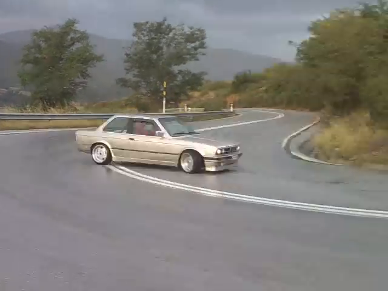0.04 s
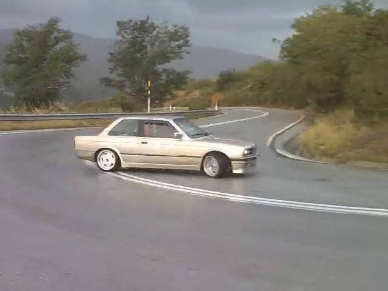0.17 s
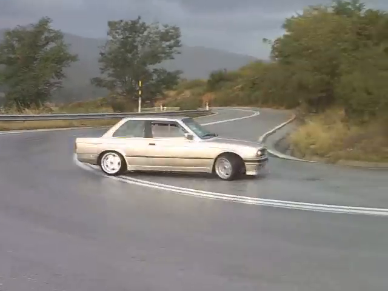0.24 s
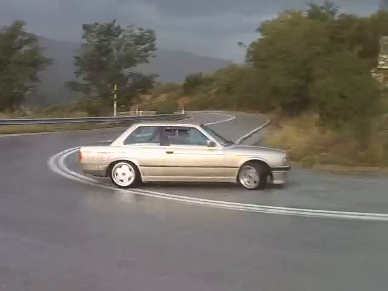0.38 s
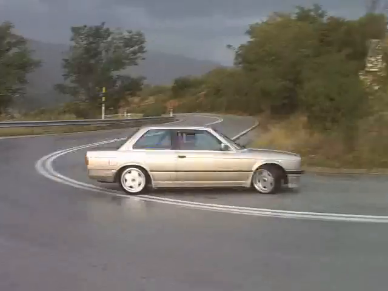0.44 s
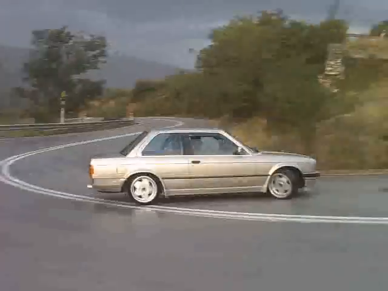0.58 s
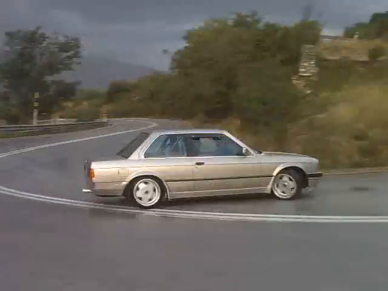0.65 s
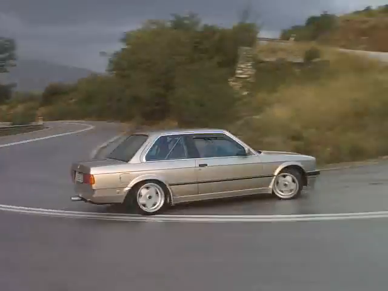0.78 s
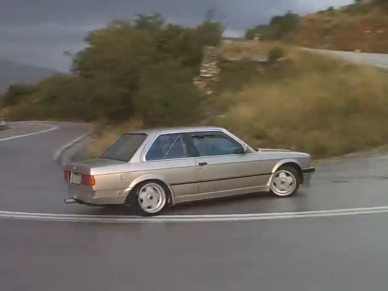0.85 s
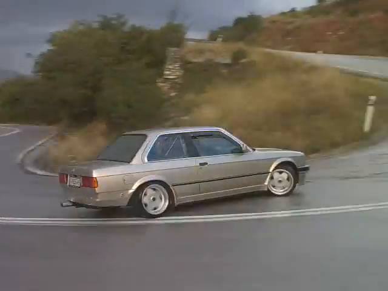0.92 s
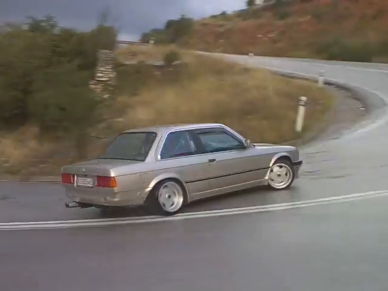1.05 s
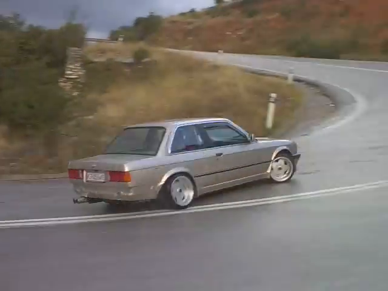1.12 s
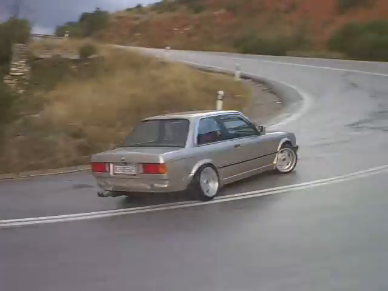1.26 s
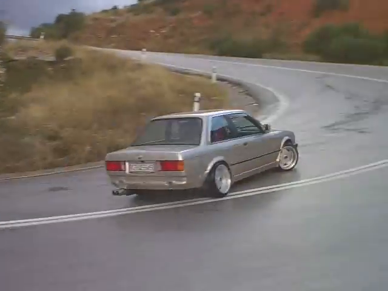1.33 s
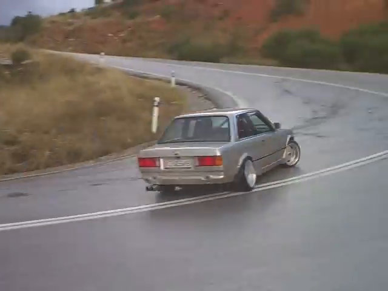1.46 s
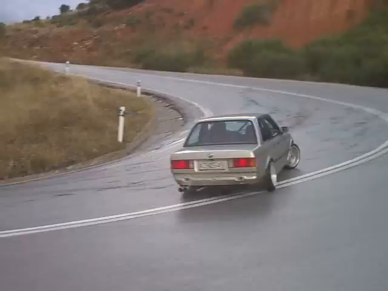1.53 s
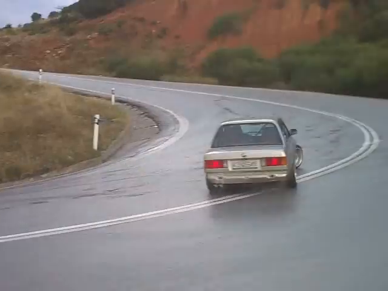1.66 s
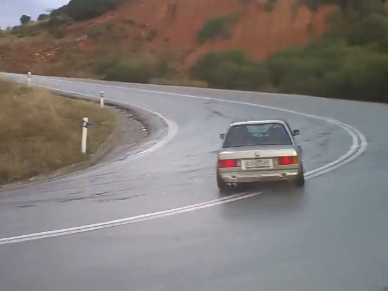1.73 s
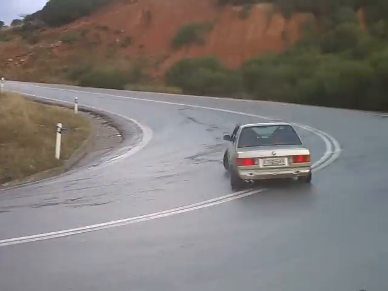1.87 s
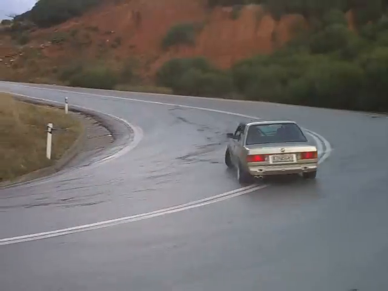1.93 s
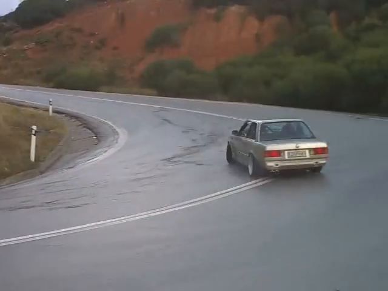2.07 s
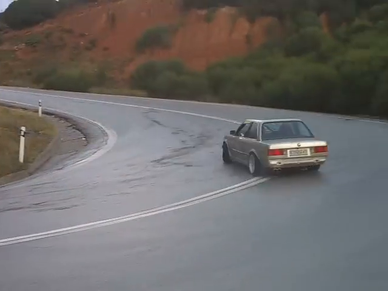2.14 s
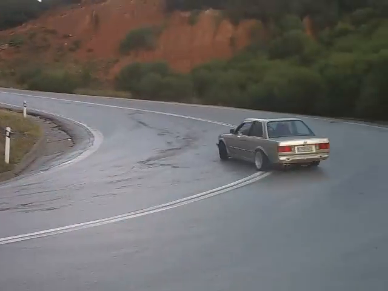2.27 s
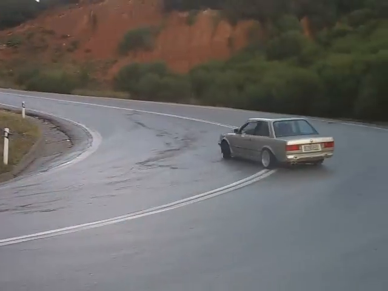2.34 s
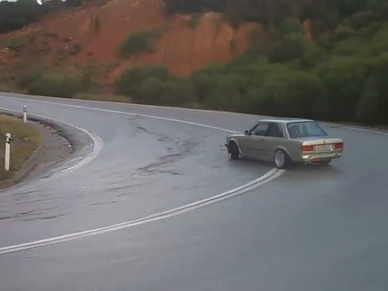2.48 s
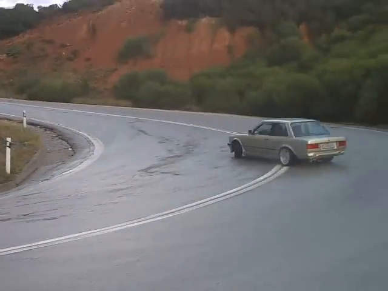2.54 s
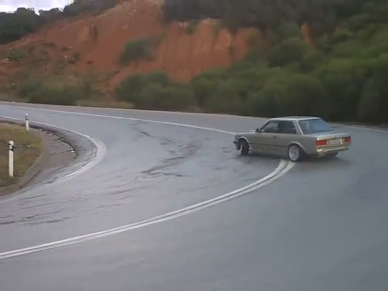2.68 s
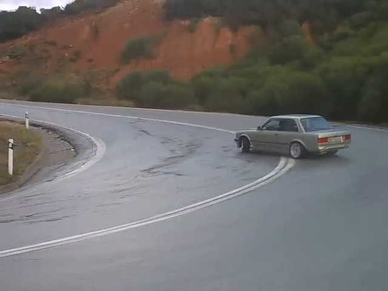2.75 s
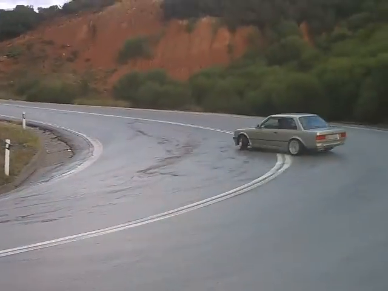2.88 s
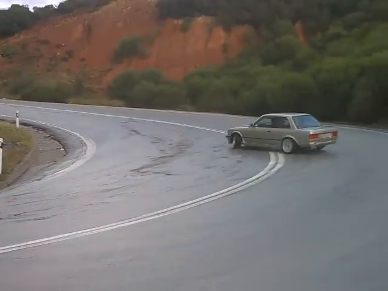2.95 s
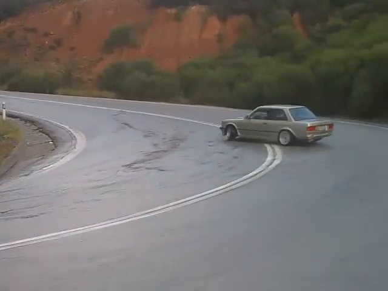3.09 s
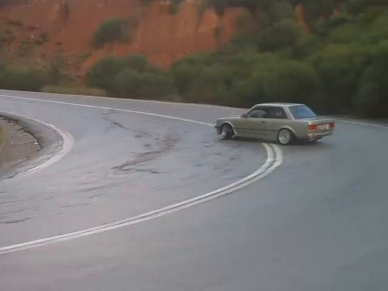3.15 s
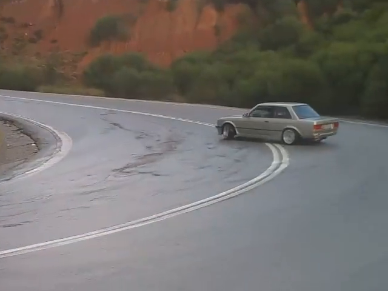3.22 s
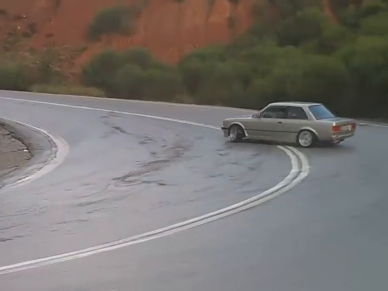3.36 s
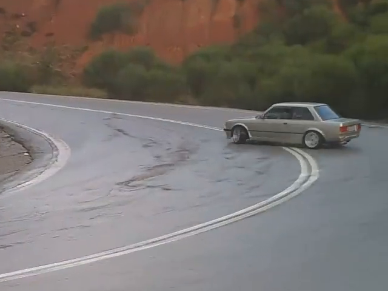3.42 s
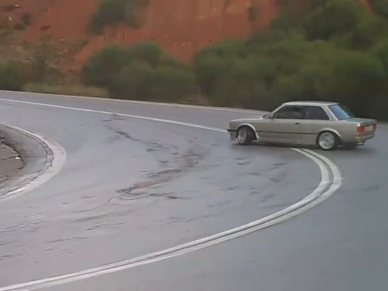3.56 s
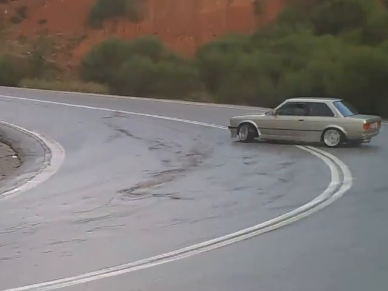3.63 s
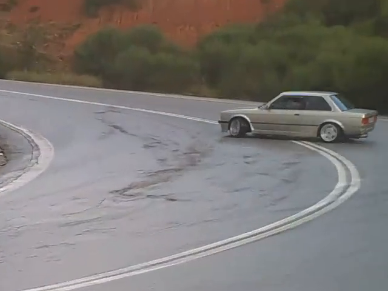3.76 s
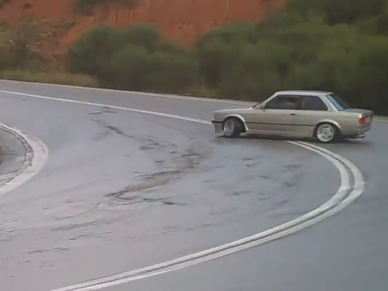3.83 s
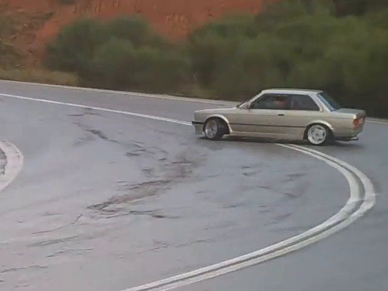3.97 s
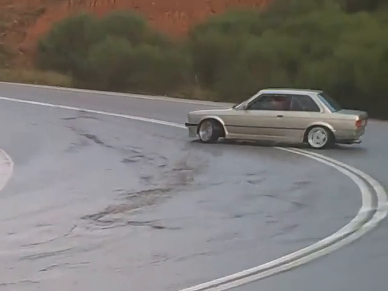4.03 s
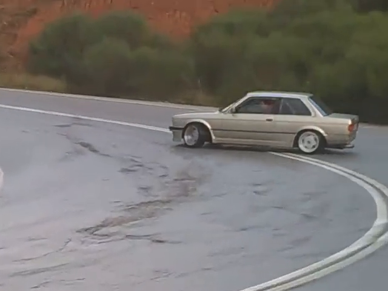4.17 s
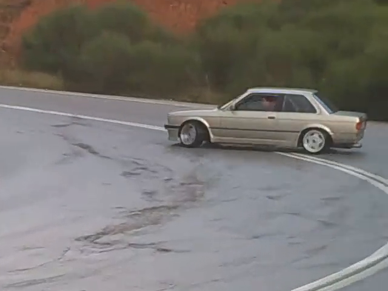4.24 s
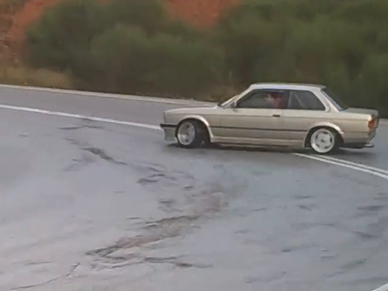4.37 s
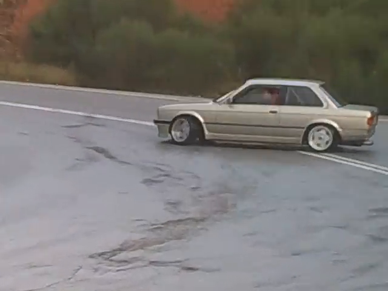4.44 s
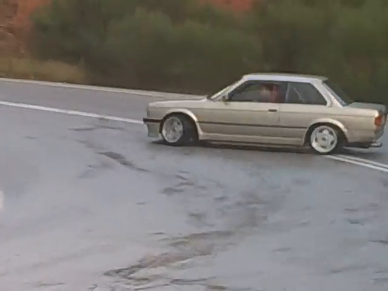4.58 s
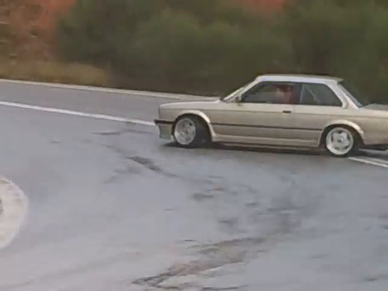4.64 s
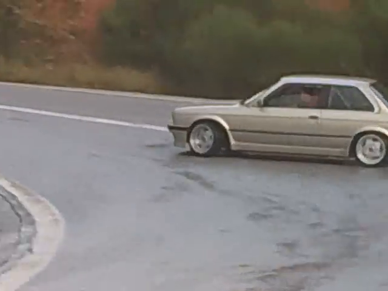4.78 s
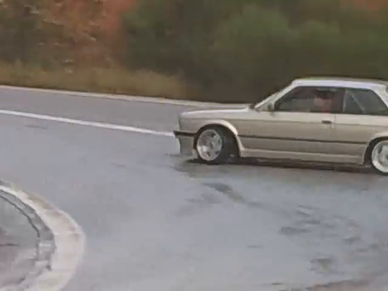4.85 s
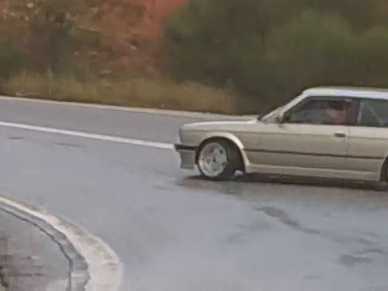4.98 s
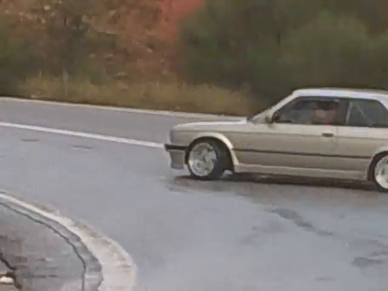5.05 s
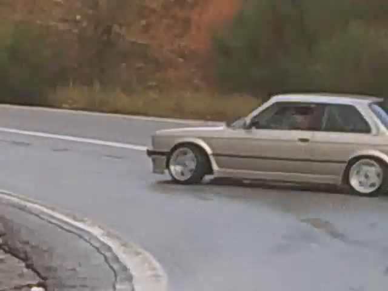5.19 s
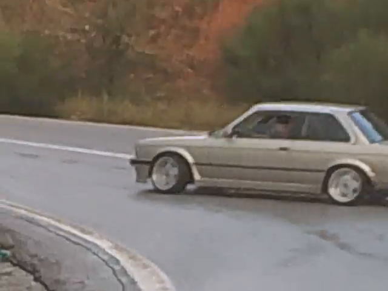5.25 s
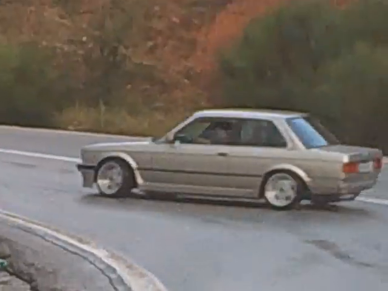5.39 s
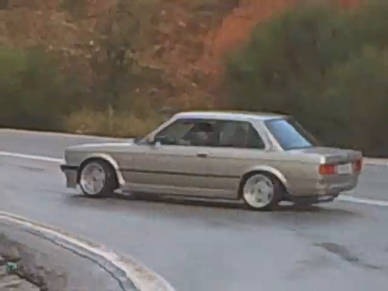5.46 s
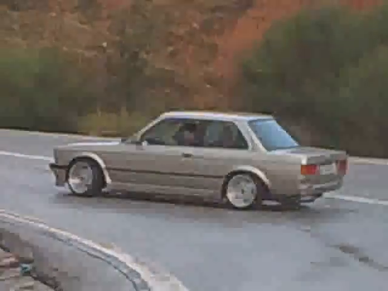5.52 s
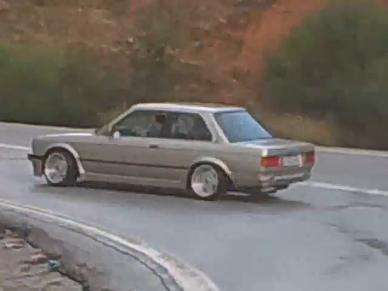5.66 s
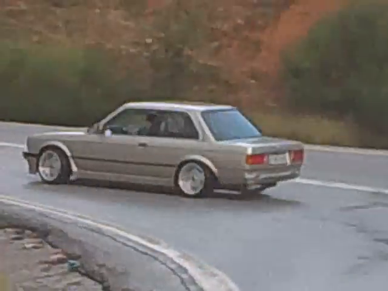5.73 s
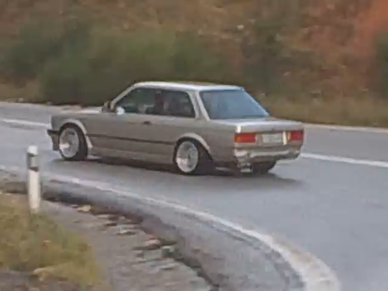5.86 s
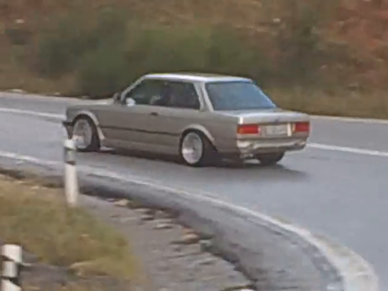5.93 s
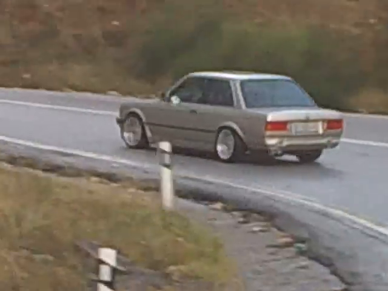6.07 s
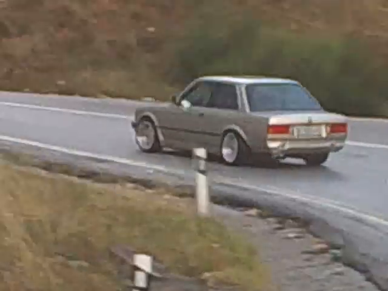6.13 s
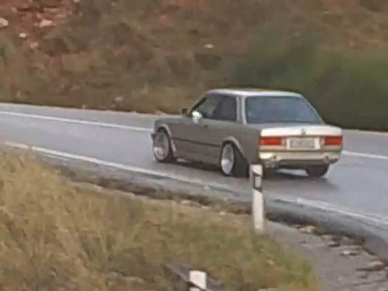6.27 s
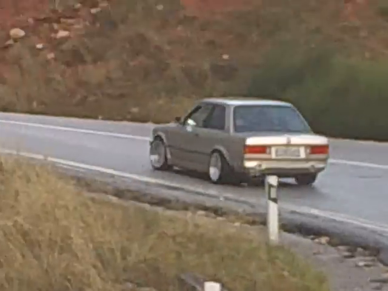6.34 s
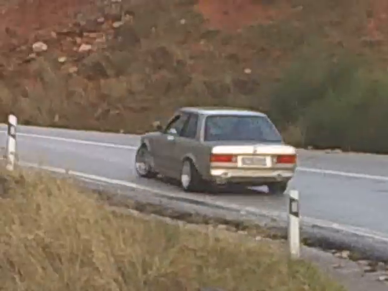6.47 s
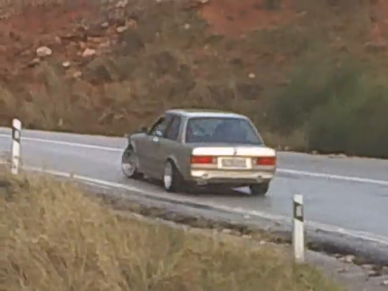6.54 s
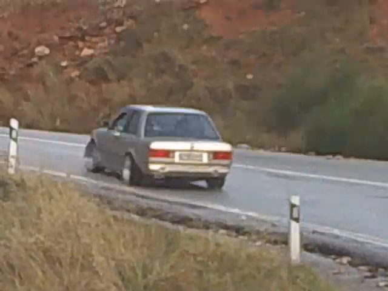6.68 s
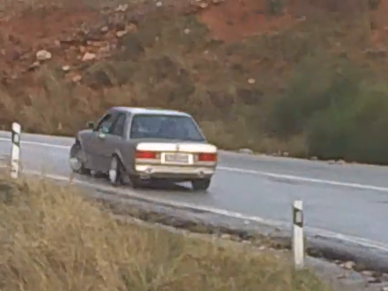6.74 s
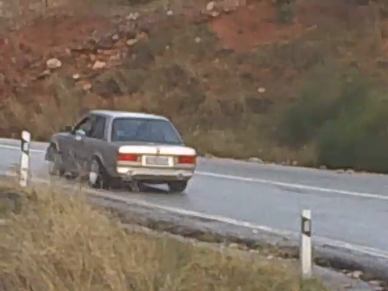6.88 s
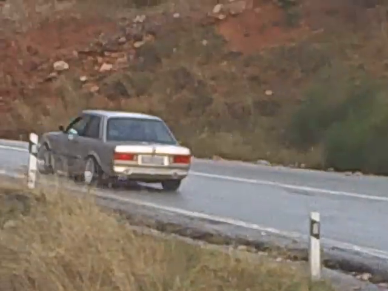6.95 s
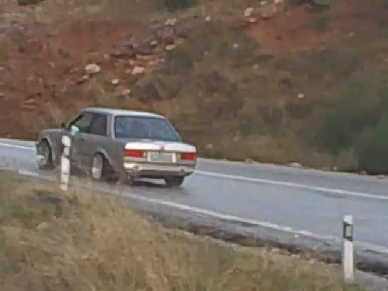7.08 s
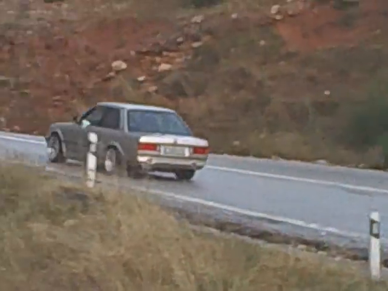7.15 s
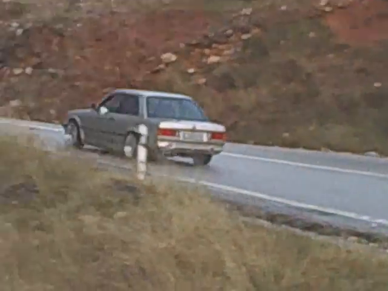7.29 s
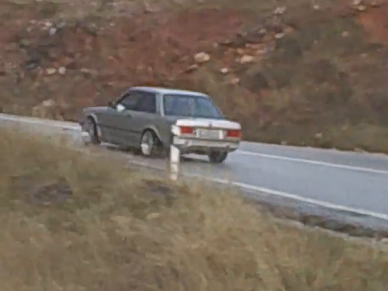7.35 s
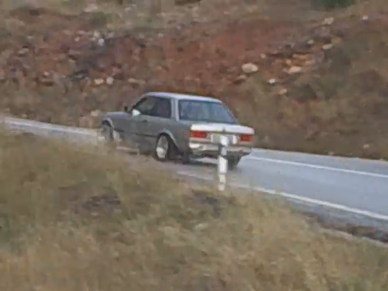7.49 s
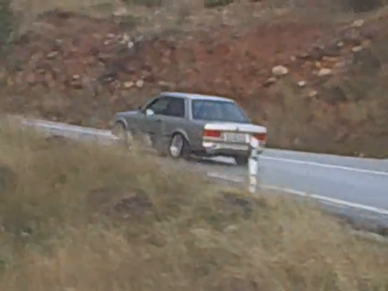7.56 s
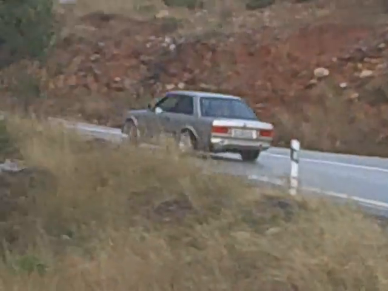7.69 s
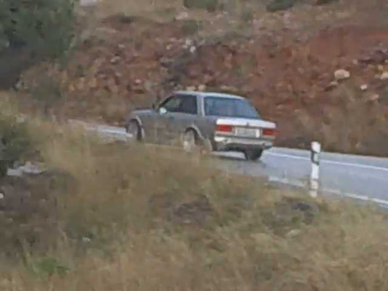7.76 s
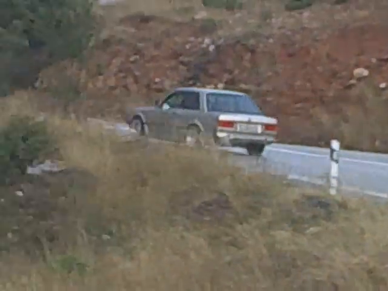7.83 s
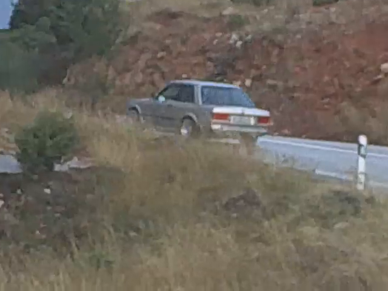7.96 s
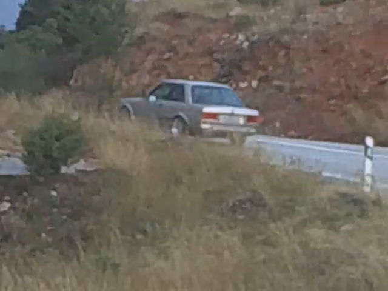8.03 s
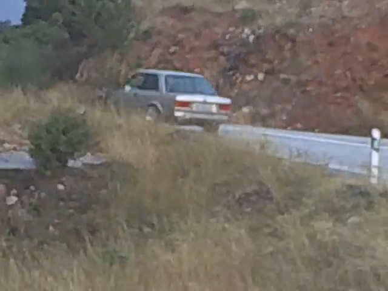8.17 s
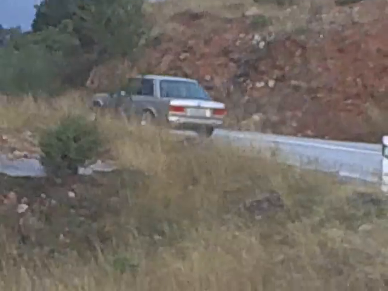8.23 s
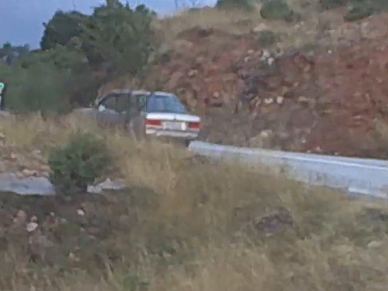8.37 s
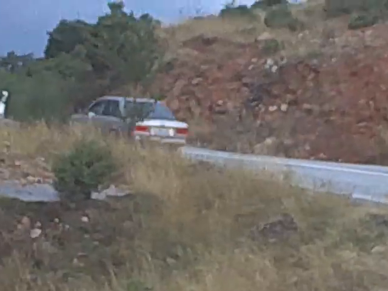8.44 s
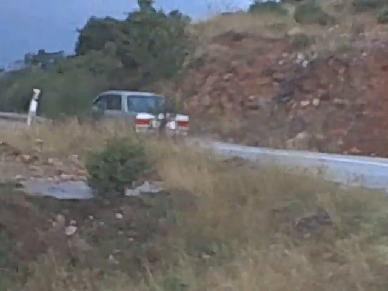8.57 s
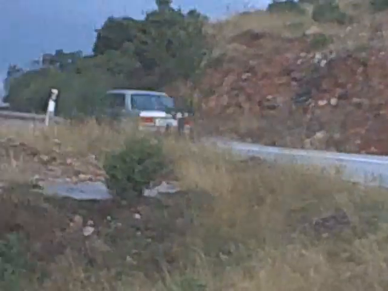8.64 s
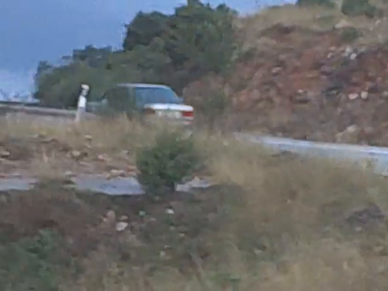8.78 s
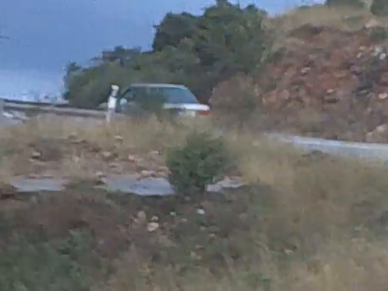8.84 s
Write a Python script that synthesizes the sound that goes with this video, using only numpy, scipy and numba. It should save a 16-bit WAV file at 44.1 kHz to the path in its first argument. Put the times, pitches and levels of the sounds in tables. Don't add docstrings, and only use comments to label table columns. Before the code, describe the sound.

Outdoors on a wet hillside road, heard through a narrow, boxy small microphone that distorts on peaks. From 0 s a car is already sliding: a gritty scrub and splash, another slip at 0.25, then at 0.6-1.2 loud rough tyre noise with quick chirps near 1 kHz while the engine pulls hard, raspy and rising, strongest around 1.1-1.3. More scrubs and a throaty climb follow to 1.8. From 2 to 3.1 it is quieter, with shorter throttle stabs; revs climb to a singing peak near 3.6 with a renewed wet hiss, then sag by 4.3. From 4.3 to 6.5 softer revs rise again, over faint tyre noise. At 6.5-7.2 tyres squeal in stuttering cries, loudest near 6.75 and again about 7.1. The engine falls to a low purr with a faint tinny rattle, fading until 8.9. A short rocky echo blurs everything.

```python
import sys
import numpy as np
from scipy import signal
from scipy.fft import rfft, irfft, next_fast_len
from scipy.io import wavfile
from scipy.ndimage import uniform_filter1d
from numba import njit

SR = 44100
rng = np.random.default_rng(int(sys.argv[2]) if len(sys.argv) > 2 else 0)


def unload_audio(sound):
    columns = np.transpose(np.atleast_2d(sound))
    steps = np.round(np.clip(columns, -1, 1) * 32767)
    wavfile.write(sys.argv[1], SR, steps.astype(np.int16))


def magnitude_from_level(level_db):
    exponent = np.asarray(level_db, float) / 20
    return 10 ** exponent


N = 392931


@njit
def svf(x, hz, width):
    y, band_state, low_state = np.empty(len(x)), 0., 0.
    for i in range(len(x)):
        g, damping = np.tan(np.pi * hz[i] / SR), width[i] / hz[i]
        v = (band_state + g * (x[i] - low_state)) / (1 + g * (g + damping))
        band_state = 2 * v - band_state
        low_state = low_state + 2 * g * v
        y[i] = damping * v
    return y


def band(x, hz, width_hz):
    return svf(x, hz * np.ones(N), width_hz * np.ones(N))


def band_twice(x, hz, width_hz):
    return band(band(x, hz, width_hz), hz, width_hz)


def unit(x):
    return x / np.sqrt(np.mean(x ** 2))


def walk(rate):
    hold = int(SR / rate)
    steps = np.repeat(rng.standard_normal(N // hold + 1), hold)
    return unit(uniform_filter1d(uniform_filter1d(steps, hold), hold)[:N])


def read(table):
    s, *columns = np.transpose(table)
    return [np.interp(np.arange(N) / SR, s, c) for c in columns]


def turns(hz):
    return np.cumsum(hz) / SR


# opens in seconds, shuts in seconds, firing rate from in Hz,
# firing rate to in Hz, exhaust level in dB.
PULLS = [(0.152, .3, 131.2, 148, -35), (.62, 1.1, 121, 170.7, -19.5), (1.099, 1.32, 170.7, 186.7, -11.5),
         (1.318, 1.81, 186.4, 213, -16.5), (2.004, 2.27, 187.9, 200.7, -29),
         (2.261, 2.42, 198.8, 196.3, -28.5), (2.462, 2.618, 177.7, 159.4, -41),
         (2.61, 2.802, 160.5, 169.2, -36), (2.798, 3.13, 168.8, 193.1, -31), (3.132, 3.63, 193.7, 221, -29),
         (3.761, 4.1, 196.9, 159.7, -42), (4.331, 4.75, 121.4, 151.9, -40), (4.753, 5.02, 151, 177.5, -45),
         (5.024, 5.28, 176.3, 193, -29), (5.27, 5.68, 191.9, 195.6, -38.5),
         (5.695, 5.86, 194.5, 186.8, -35), (5.85, 6.152, 186.3, 198.7, -33.5),
         (6.15, 6.541, 198.3, 202.5, -34), (6.781, 7.12, 154.1, 139.3, -43.5),
         (7.138, 7.36, 135.1, 110.8, -39.5), (7.395, 7.9, 110.8, 119.6, -45.5),
         (7.892, 8.76, 119.3, 131.9, -50), (8.779, 8.91, 132, 159.2, -50)]
START_HZ, CEILING_HZ = 119.1, 268.2
LINGER_S = 0.038
PEDAL_S = .06


def throttle():
    t = np.arange(N) / SR
    opens, shuts, from_hz, to_hz, db = np.transpose(PULLS)
    s = np.maximum.accumulate(np.r_[0, np.c_[opens, shuts].ravel()])
    hz = np.r_[START_HZ, np.c_[from_hz, to_hz].ravel()]
    down = sum((t > a - .002) & (t < b + .002) for a, b in zip(opens, shuts)) > 0
    climb = CEILING_HZ - np.exp(np.interp(t, s, np.log(CEILING_HZ - hz)))
    hz = uniform_filter1d(np.where(down, climb, np.interp(t, s, hz)), size=SR // 16)
    keep = np.exp(-1 / (LINGER_S * SR))
    flow = np.maximum(down, signal.lfilter([1 - keep], [1, -keep], 1. * down))
    level_db = np.interp(t, (opens + shuts) / 2, db)
    return hz, level_db, uniform_filter1d(flow, max(int(PEDAL_S * SR), 1))


SLIDE_ATTACK_DB_S, SLIDE_RELEASE_DB_S = 199, 96.5


def slides(table, rest_db):
    t = np.arange(0, N + 64, 64) / SR
    power = magnitude_from_level(2 * np.interp(t, np.arange(N) / SR, rest_db))
    for s, length, db, *_ in table:
        attack_db = SLIDE_ATTACK_DB_S * np.maximum(s - t, 0)
        release_db = SLIDE_RELEASE_DB_S * np.maximum(t - s - length, 0)
        power = power + magnitude_from_level(2 * (db - attack_db - release_db))
    s, length, _, *columns = np.transpose(table)
    return read(np.c_[t, np.sqrt(power)]) + read(np.c_[s + length / 2, np.transpose(columns)])


def spray(hz, width_hz, patchy_db):
    x = band_twice(rng.standard_normal(N), hz, width_hz)
    return unit(x * magnitude_from_level(patchy_db * walk(55) + .4 * walk(6)))


def slip(hz, overtone_db, wobble, flicker_db):
    phase = 2 * np.pi * turns(hz * (1 + wobble * walk(90)))
    overtones = np.sin(2 * phase) + 0.55 * np.sin(3 * phase)
    wave = np.sin(phase) + magnitude_from_level(overtone_db) * overtones
    return unit(magnitude_from_level(flicker_db * walk(60))) * wave * np.sqrt(2)


def scrub(hz, width_hz):
    blocks = sum(slip(hz + width_hz * (side + .12 * walk(9)), -18.5, .035, 4.5) for side in (-.3, 0, .35))
    return 0.59 * unit(blocks) + 0.8 * spray(hz, width_hz, 2.9)


# start in seconds, length in seconds, level in dB, centre in Hz.
SPLASHES = [
    (0, 0.036, -15.5, 1613),
    (.25, 0.045, -22.5, 1880),
    (.82, 0.13, -23.5, 2320),
    (3.36, .12, -30, 2408),
    (6.69, 0.051, -28.5, 1780),
    (6.82, 0.13, -40.5, 2487),
    (7.01, .03, -34, 2480),
]


def splashes():
    gain, hz = slides(SPLASHES, np.full(N, -120))
    return gain * spray(hz, 590, patchy_db=2.5)


# time in seconds, nearness in dB, depth of water as spray in dB.
ROLL = [(0, -25.5, -4), (.6, -27, -1.5), (1.1, -20, 1), (1.4, -29.5, -0.5), (1.8, -28.5, -8.5),
        (2.2, -39.5, 2), (3.15, -44.5, 3), (3.45, -29, -1.5), (3.95, -40, 3), (4.35, -48.5, -1),
        (4.62, -59.5, 5), (5.1, -50, 5), (6.0, -49, 13.5), (6.6, -50, 12.5), (6.9, -36, 7), (7.3, -55, 0.5),
        (7.7, -63.5, 9), (8.91, -67.5, 9.5)]
# start in seconds, length in seconds, scrub level in dB,
# scrub centre in Hz, scatter of the tread blocks in Hz.
SLIDES = [(0, 0.0966, -19, 1130, 500), (.25, .2, -27, 1175, 450), (.58, .2, -13.5, 1170, 400),
          (.92, .26, -16.5, 1300, 410), (1.44, .11, -18, 1060, 420), (1.64, .15, -17, 1130, 420),
          (1.89, .12, -24, 1250, 429.2), (2.1, .2, -30, 1186, 442), (2.45, .2, -38, 1100, 460),
          (2.9, .3, -35.5, 1050, 480), (3.36, .3, -31.5, 1025, 500), (3.72, .2, -35.5, 1015, 520),
          (4.0, .3, -47, 1101, 551), (4.45, .1, -48.5, 978.3, 399.4), (5.0, .2, -59, 961, 498.6),
          (5.8, .45, -40.5, 1310, 600), (6.4, .08, -30, 1270, 550), (6.5, .1, -31, 1093, 299.2),
          (6.62, .04, -23.5, 1040, 252), (6.72, 0.088, -19.5, 961.7, 249.6), (6.86, 0.22, -27, 1050, 278.2),
          (7.4, .3, -51.5, 1010, 298.3), (8.0, .8, -55.5, 1001, 302.7)]
GRIP_DB = -0.5


def tyres():
    hiss_db, water_db = read(ROLL)
    scrub_gain, scrub_hz, width_hz = slides(SLIDES, hiss_db + GRIP_DB)
    sliding = scrub_gain * magnitude_from_level(-1.5) * scrub(scrub_hz, width_hz)
    spray_hz = 1700 * (1 + 0.029 * walk(4.1))
    water = magnitude_from_level(hiss_db + water_db - 1.5) * spray(spray_hz, 100 + 0.87 * width_hz, patchy_db=2.2)
    hiss = magnitude_from_level(hiss_db - 0.5) * spray(2467, 700, patchy_db=2.7)
    mist = magnitude_from_level(uniform_filter1d(hiss_db, size=SR // 3) - 3.0) * spray(3215, 1700, patchy_db=2.5)
    drumming = magnitude_from_level(uniform_filter1d(hiss_db, size=SR // 4) - 13) + magnitude_from_level(throttle()[1] - 20)
    rumble = drumming * spray(81, 130, 1.2)
    return sliding + water + hiss + mist + rumble + splashes()


# pitch in Hz, gain in dB.
EXHAUST = [(115, -1.5), (160, -9.5), (195, -1.5), (340, 1), (405, 1), (438, -2.5), (490, -13), (620, -13.5)]
ORDER_DB = [-4, 0, -8]


def firing_tone(hz, level_db, cycle, boom_db, third_db):
    pipe_hz, pipe_db = np.transpose(EXHAUST)
    tone = 0
    for k, (order_db, aim_db) in enumerate(zip(ORDER_DB, (boom_db, 0, third_db))):
        resonance_db = np.interp(np.log((k + 1) * hz), np.log(pipe_hz), pipe_db)
        line_db = level_db + order_db + resonance_db + aim_db
        tone = tone + magnitude_from_level(line_db + 2.5 + 1.5 * walk(30)) * np.sin(2 * np.pi * (k + 1) * cycle)
    return tone


CYLINDER_DB = [5.5, -5, 2, 0.5, -2, -1.5]
# pitch in Hz, width in Hz, level in dB.
PIPE = [(110, 540, -9.5), (187, 75, -1.5), (339, 91, 2), (543, 86, -7.5), (830, 890, -12.5)]


def rasp(cylinder, scatter_db, shape):
    cylinder_gain = magnitude_from_level(np.array(CYLINDER_DB))
    puff = magnitude_from_level(np.array(CYLINDER_DB)[cylinder] + scatter_db)
    uneven = (puff - .95 * np.mean(cylinder_gain)) * shape
    pipe = 0
    for k, (hz, width_hz, db) in enumerate(PIPE):
        gas = 0.28 * rng.standard_normal(N)
        pipe = pipe + (-1) ** k * magnitude_from_level(db) * band(uneven + gas, hz, width_hz)
    return unit(pipe)


HOWL_DB = [0, -15, -1, -17, -1.5, -14]


def howl(cylinder, scatter_db, shape):
    grit = 1 + 0.22 * rng.standard_normal(N)
    crack = magnitude_from_level(np.array(HOWL_DB)[cylinder] + scatter_db) * shape * grit
    return unit(band_twice(crack, 900, 460))


# time in seconds, level in dB.
RATTLE = [
    (0, -67.5),
    (6.9, -70.5),
    (7.3, -60),
    (7.8, -54),
    (8.3, -57),
    (8.75, -56.5),
    (8.91, -70),
]
RATTLE_TURN = 0.49


def shield_rattle(cycle):
    turn = (cycle / len(CYLINDER_DB) + RATTLE_TURN) % 1
    shake = (.12 + np.exp(-turn / .25)) * magnitude_from_level(1.5 * walk(20)) * rng.standard_normal(N)
    rattle = band_twice(shake, 980, 260) + magnitude_from_level(-12.5) * band_twice(shake, 1200, 350)
    return magnitude_from_level(read(RATTLE)[0]) * unit(rattle)


# time in seconds, gain of the boom in dB,
# gain of the third harmonic in dB, gain of the howl in dB.
AIM = [(0, -10.5, 5.5, -4.5), (.7, -2.5, 7, -4), (1.18, -5.5, -2, -12.5), (1.3, -1.5, 4, -11.5),
       (1.7, 6, 5, 5), (2.1, -4.5, -7.5, -2.5), (2.7, 1.5, -4, -4), (3.1, 2.5, -1, -2), (3.5, 7, 4.5, 5.5),
       (4.5, -6, 3, 0.5), (4.85, 1.5, -4.5, 2.5), (5.2, -3, 2.5, 6.5), (5.5, -22, 2, 5),
       (5.68, 0.5, -9, 3.5), (6.1, -6, -3, -2.5), (6.42, 4.5, -6, -5), (7.3, 0.5, -1.5, -13),
       (8.91, 6, -8.5, 0)]
RASP_DB, RASP_SHARE = -6.5, 0.46
HOWL_OVER_DB, HOWL_DB_PER_HZ = 0.5, 0.1
HALF_ORDER_DB = -3.5
LIFT_DB, LIFT_RASP_DB = -15, -7
LOAD_HZ_PER_S, UNLOADED_DB = 30, -10
OVERRUN_HZ_PER_S, OVERRUN_ROUGH = 110, 6


def engine():
    hz, level_db, pedal = throttle()
    boom_db, third_db, aim_db = read(AIM)
    near_db = read(ROLL)[0]
    lift_db = LIFT_DB * (1 - pedal)

    climb = uniform_filter1d(np.gradient(hz) * SR, size=SR // 10)
    load = np.clip(climb / LOAD_HZ_PER_S, 0, 1)
    overrun = np.clip(-climb / OVERRUN_HZ_PER_S, 0, 1)
    rasp_db = RASP_SHARE * near_db + (1 - RASP_SHARE) * level_db + RASP_DB + LIFT_RASP_DB * (1 - pedal)
    howl_db = near_db + aim_db + UNLOADED_DB * (1 - load) + lift_db
    howl_db = howl_db + HOWL_OVER_DB + HOWL_DB_PER_HZ * (hz - 215)

    cycle = turns(hz * (1 + 0.0023 * (1 + OVERRUN_ROUGH * overrun) * walk(25)))
    firing = cycle.astype(int)
    cylinder = firing % len(CYLINDER_DB)
    scatter_db = .8 * rng.standard_normal(N)[firing]
    shape = np.exp(-(cycle - firing) / 0.058)

    tone = firing_tone(hz, level_db + lift_db, cycle, boom_db, third_db)
    bank_beat = magnitude_from_level(rasp_db + HALF_ORDER_DB + lift_db) * np.sin(2 * np.pi * cycle * len(CYLINDER_DB) / 4)
    rough = magnitude_from_level(rasp_db + 4.5) * rasp(cylinder, scatter_db, shape)
    howling = magnitude_from_level(howl_db + 3.0 * walk(10)) * howl(cylinder, scatter_db, shape)
    return tone + bank_beat + rough + howling + shield_rattle(cycle)


# time in seconds, pitch in Hz, level in dB, overtones in dB.
SQUEAL = [
    (6.45, 1135, -39, -18.5),
    (6.53, 1055, -14.5, -29),
    (6.64, 1083, -32, -32),
    (6.72, 940, -2.5, -10.5),
    (6.806, 890, -27.5, -10),
    (6.87, 1040, -10, -30),
    (6.985, 999, -43, -29),
    (7.078, 1073, -7, -20),
    (7.24, 1025, -73, -10),
]
# time in seconds, peak in dB, pitch in Hz, length in seconds,
# overtones in dB.
GRABS = [(0.602, -4, 1260, 0.013, -19), (0.655, -5.5, 1010, 0.0081, -15), (0.715, -.5, 1098, 0.0076, -17),
         (0.772, -12, 1160, 0.021, -19), (0.922, -7.5, 1010, 0.02, -15), (1.036, -3.5, 1252, 0.017, -21.5),
         (6.582, -20.5, 1010, 0.032, -39), (6.655, -9, 1030, 0.019, -32.5), (6.694, -11, 1020, 0.012, -19),
         (6.7, -20, 918, 0.0095, -5), (6.712, -18, 902, 0.016, 3.5), (6.728, -16, 946, 0.018, -7),
         (6.742, -14, 981, 0.012, -7), (6.758, -8, 925.4, 0.024, -15.5), (6.773, -9.5, 947, 0.016, -18.5),
         (6.825, -8.5, 968, 0.011, -26), (6.844, -15, 1089, 0.011, -23.5), (6.87, -11, 1040, 0.023, -34),
         (6.892, -8, 1036, 0.027, -30), (7.014, -4.5, 1048, 0.022, -19.5), (7.027, -6, 1103, 0.018, -15),
         (7.078, -2, 1094, 0.02, -23.5), (7.094, -8.5, 1050, 0.026, -19), (7.121, -14, 1075, 0.015, -13)]


def squeal():
    hz, level_db, overtone_db = read(SQUEAL)
    t = np.arange(N) / SR
    on = np.interp(t, [6.4, 6.46, 7.22, 7.3], [0, 1, 1, 0])
    out = on * magnitude_from_level(level_db - 11) * slip(hz, overtone_db, .02, 4.5)
    grab_t = t[:4096]
    for s, db, pitch_hz, length, over_db in GRABS:
        start = int((s - .003) * SR)
        swell = np.sin(np.pi * np.minimum(grab_t / max(length, .004), 1) ** .8) ** 2
        phase = 2 * np.pi * pitch_hz * grab_t
        overtones = np.sin(2 * phase) + 0.81 * np.sin(3 * phase)
        out[start:start + 4096] += magnitude_from_level(db - 4.5) * swell * (np.sin(phase) + magnitude_from_level(over_db) * overtones)
    return out


def hillside_echo(car):
    t = np.arange(SR // 2) / SR
    slope = rng.standard_normal(len(t)) * np.exp(-np.log(1000) * t / 0.12) * (t > .02)
    return signal.fftconvolve(car, slope / np.sqrt(np.sum(slope ** 2)))[:N]


def scene():
    car = tyres() + engine() + squeal()
    wind = magnitude_from_level(-80.5) * spray(500, 1700, 1.5)
    return (car + magnitude_from_level(-11.5) * hillside_echo(car) + wind)[None]


def top_cut(x):
    return signal.sosfilt(signal.butter(12, 15800, fs=SR, output="sos"), x)


# pitch in Hz, gain in dB.
TONE = [(40, -13), (150, -6.5), (400, 0.5), (2800, -1.5), (3400, -4), (3900, -13), (4300, -21), (4700, -79)]
CLIP_AT = .714


def record(dry):
    size = next_fast_len(N + SR)
    hz = np.maximum(np.arange(size // 2 + 1) * SR / size, 1)
    tone_hz, tone_db = np.transpose(TONE)
    colour = magnitude_from_level(np.interp(np.log(hz), np.log([*tone_hz, 5200]), [*tone_db, -140]))
    lead = np.c_[dry, np.zeros((1, size - N - 4096)), dry[:, 4096:0:-1]]
    x = irfft(rfft(lead) * colour, size)[:, :N]
    mix = np.clip(x, -CLIP_AT, CLIP_AT)
    return top_cut(mix)


dry = scene()
out = record(dry)
unload_audio(out)
```